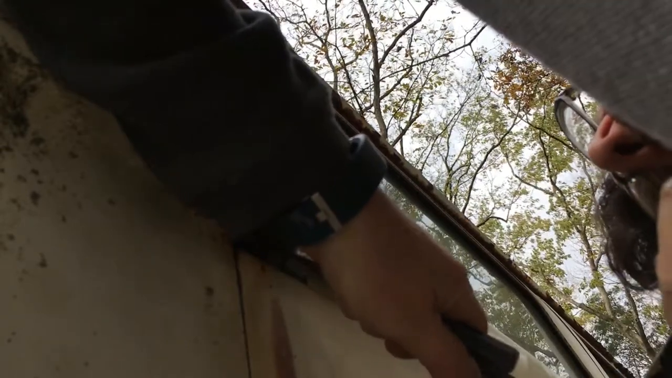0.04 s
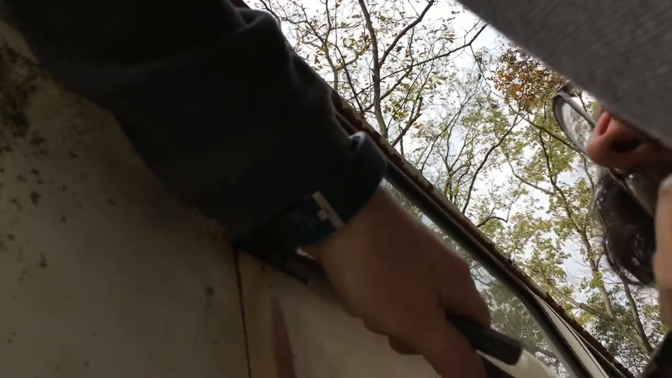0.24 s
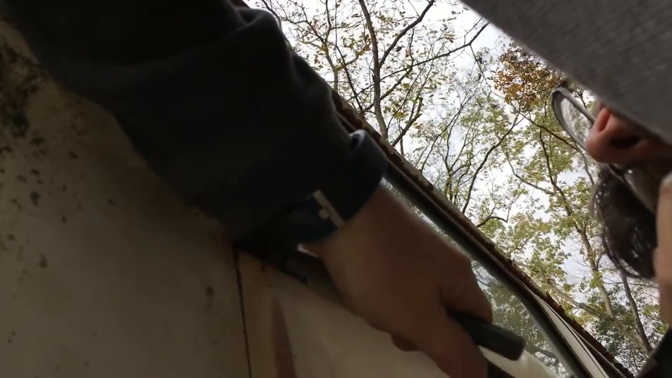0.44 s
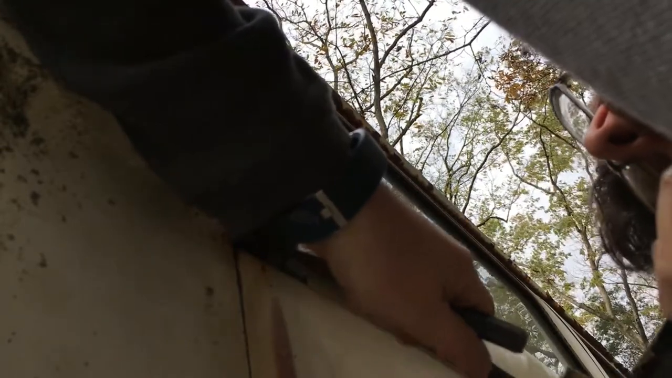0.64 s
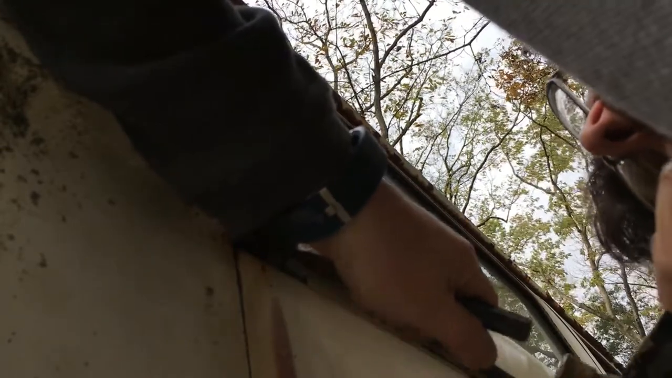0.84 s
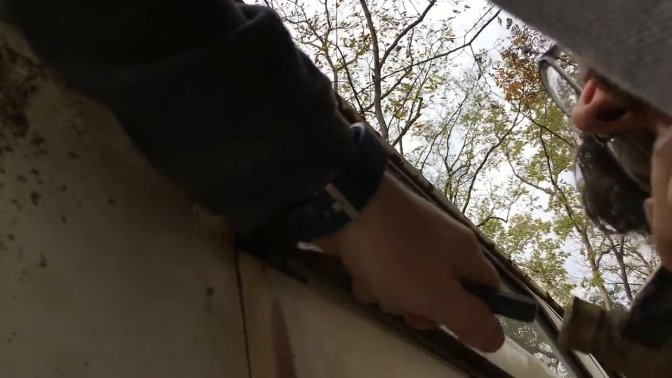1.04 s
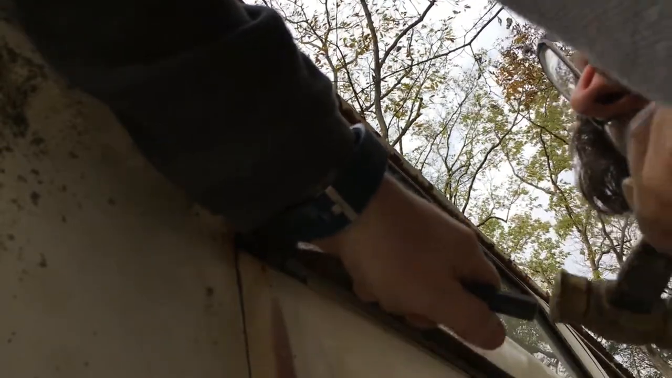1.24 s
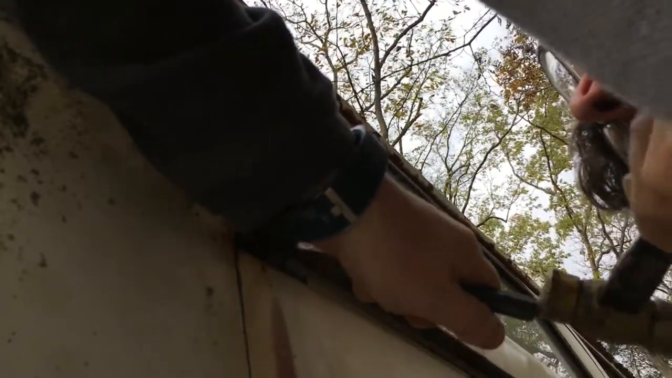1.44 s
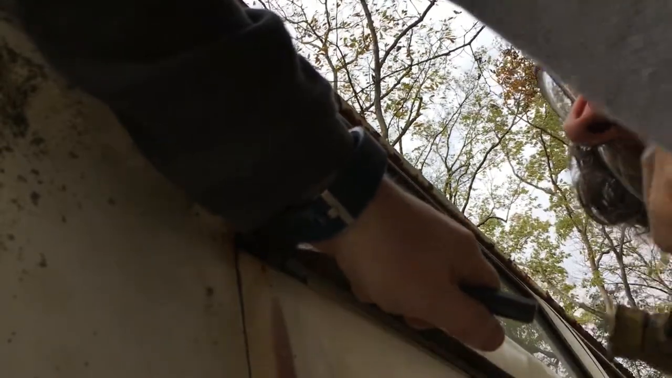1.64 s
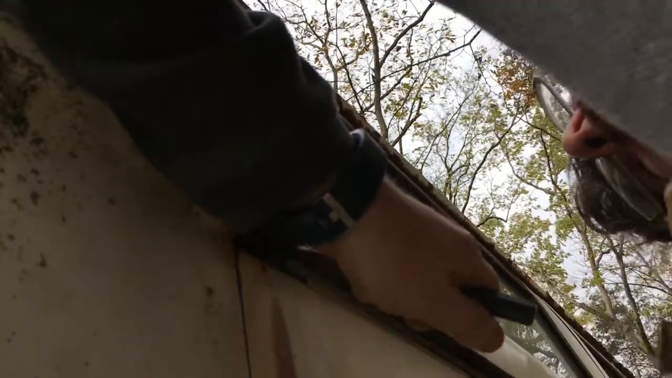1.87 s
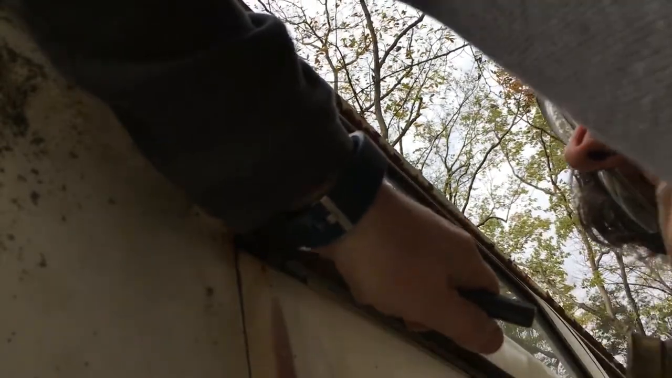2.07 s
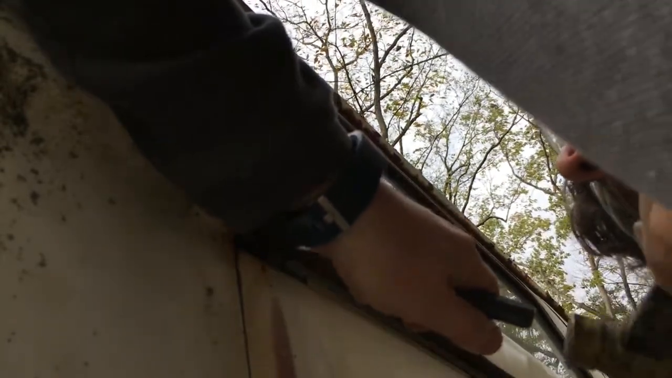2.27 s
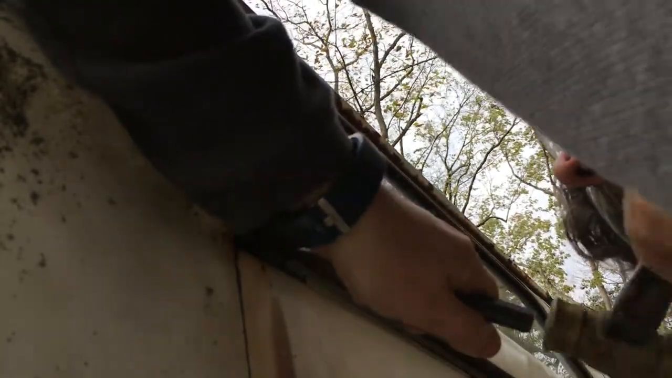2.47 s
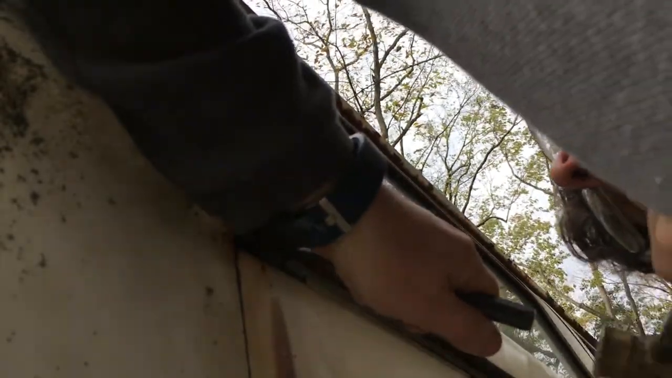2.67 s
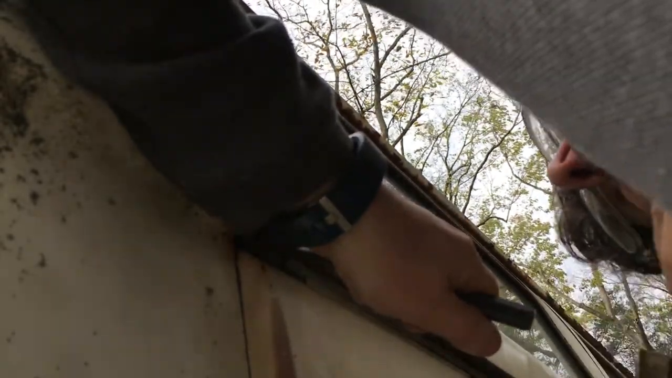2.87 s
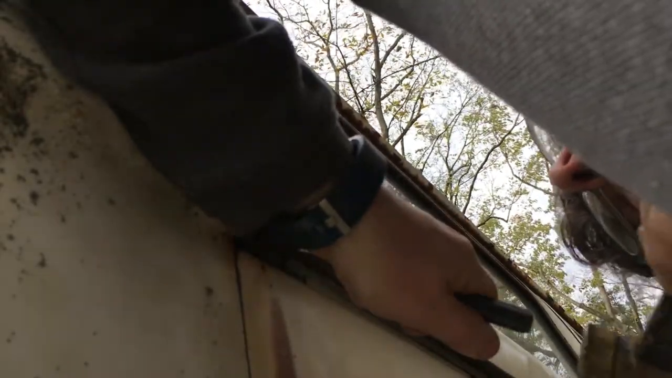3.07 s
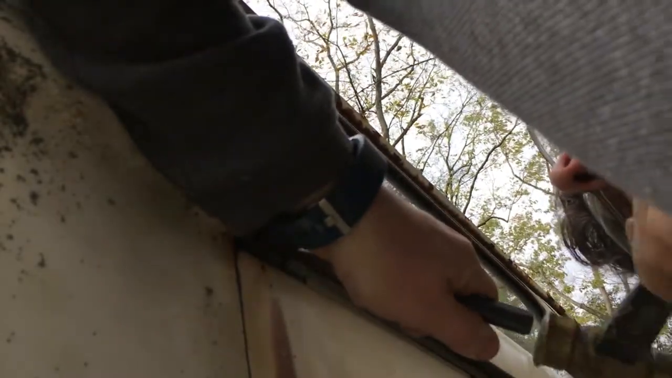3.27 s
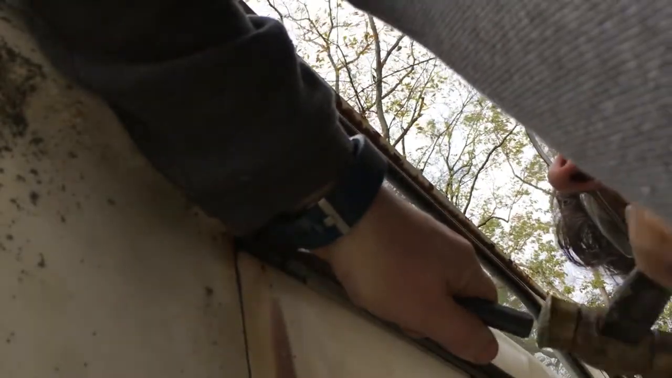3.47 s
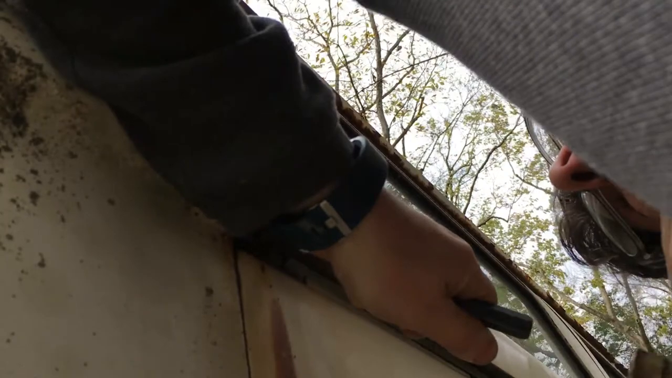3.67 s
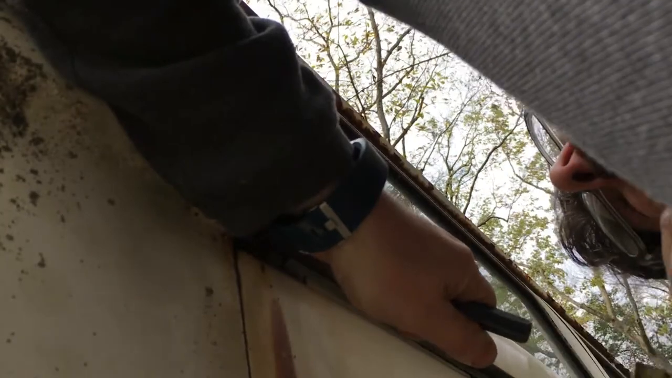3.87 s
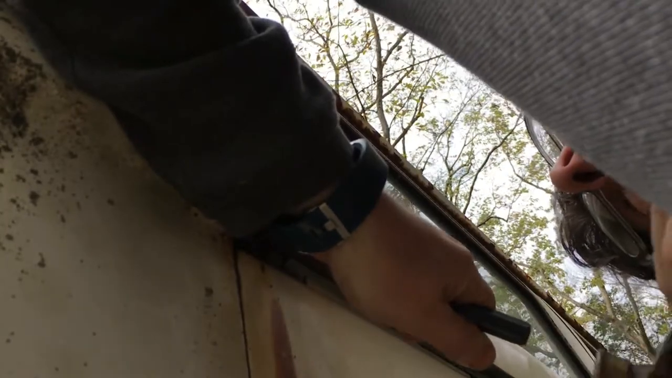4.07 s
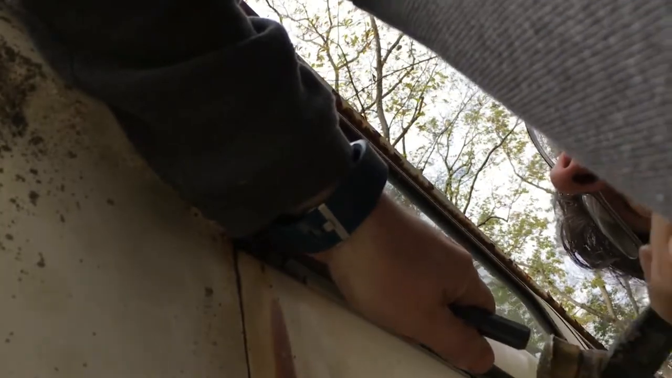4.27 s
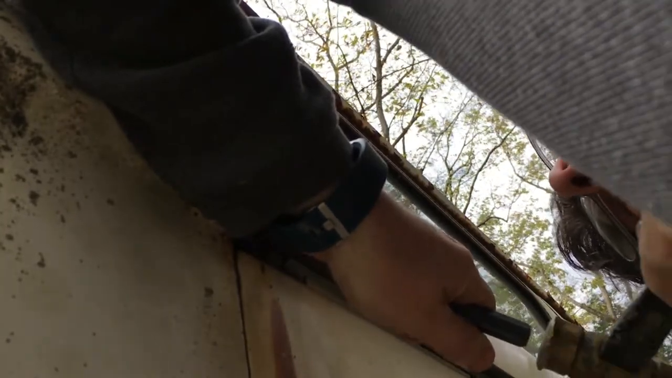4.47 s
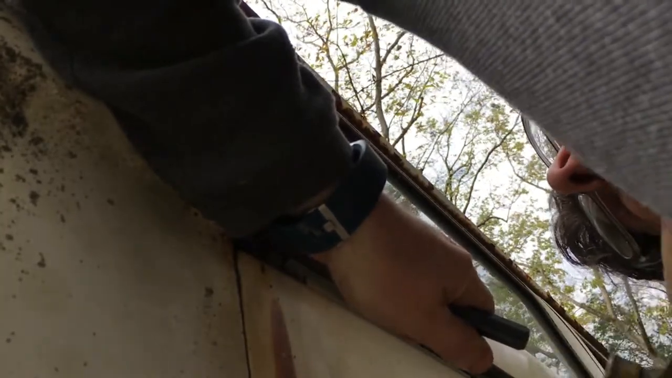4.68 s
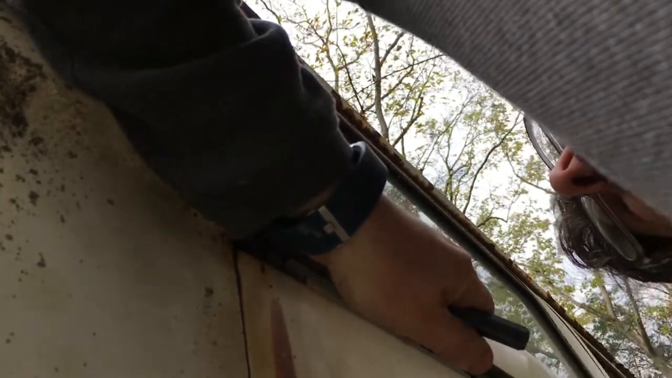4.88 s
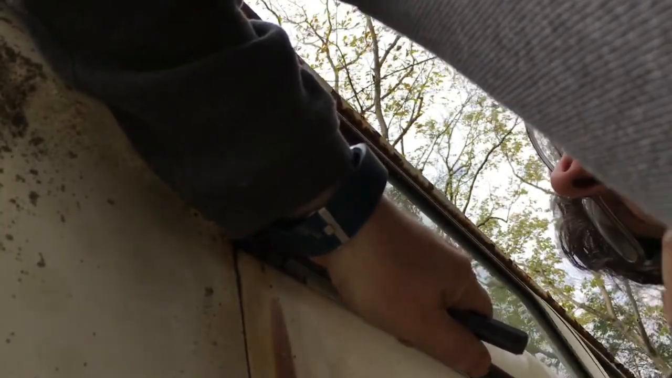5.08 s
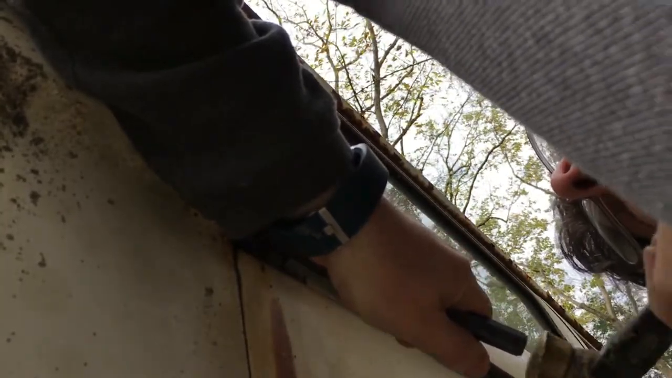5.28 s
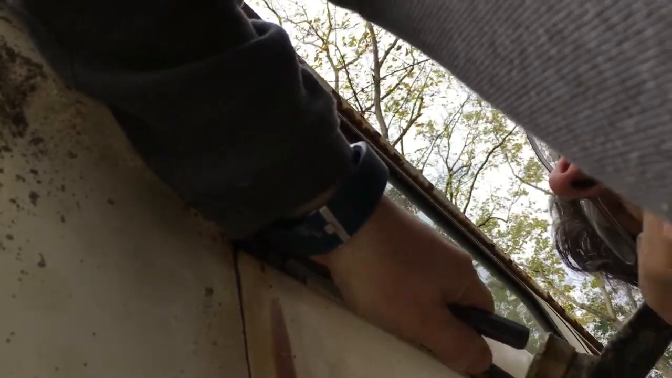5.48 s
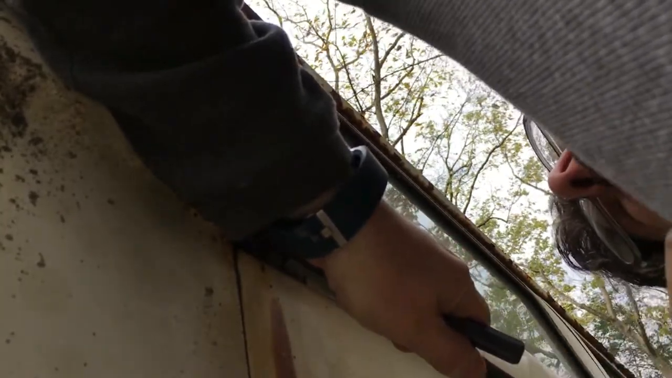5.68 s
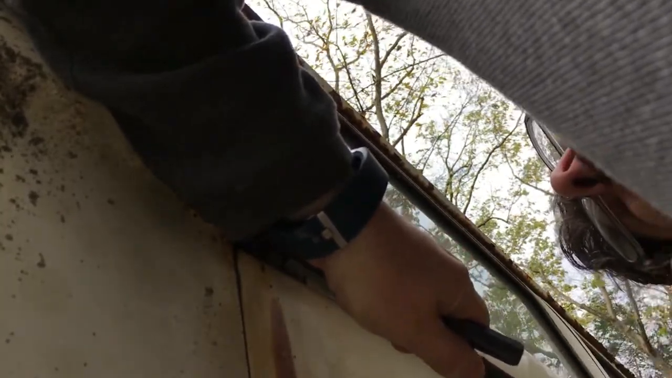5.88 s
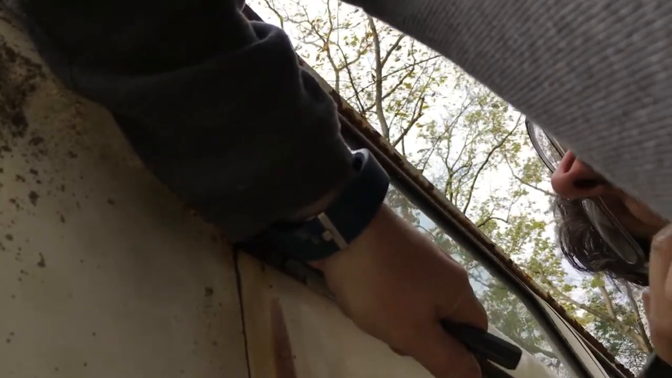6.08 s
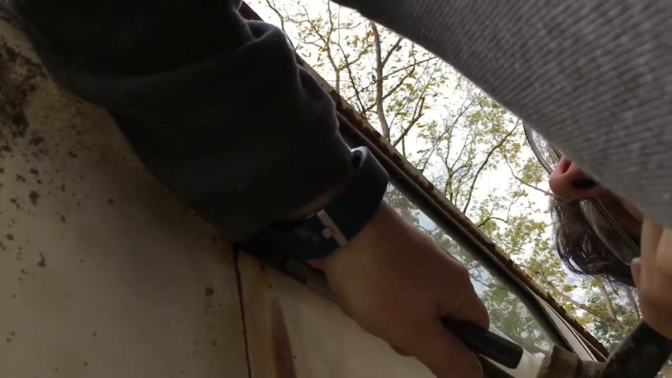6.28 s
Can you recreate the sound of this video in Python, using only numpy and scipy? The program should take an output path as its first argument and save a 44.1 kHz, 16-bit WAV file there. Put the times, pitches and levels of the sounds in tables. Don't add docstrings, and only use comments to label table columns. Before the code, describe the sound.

A hammer drives a cold chisel against a stuck screw in a hollow sheet-metal body. First come wind thumps and soft scuffing knocks, then a duller first blow, then steady loud clanks about a quarter second apart. They grow brighter while the chisel's ring sinks slightly in pitch. Dry open air, near microphone, background almost buried under the blows.

```python
import sys
import numpy as np
from scipy import signal
from scipy.fft import rfft, irfft
from scipy.io import wavfile

SR = 44100
rng = np.random.default_rng(int(sys.argv[2]) if len(sys.argv) > 2 else 0)


def wav_out(sig):
    wavfile.write(sys.argv[1], SR, np.round(np.clip(np.atleast_2d(sig).T, -1, 1) * 32767).astype(np.int16))


def voltage_ratio(decibels):
    exponent = np.asarray(decibels, float) / 20
    return 10 ** exponent


N = 278712


def rms_one(x):
    return x / np.sqrt(np.mean(x ** 2) + 1e-20)


def at_hz(points, hz):
    table_hz, values = np.array(points).T
    return np.interp(np.log(hz), np.log(table_hz), values)


def bandpass(x, low_hz, high_hz):
    return signal.sosfilt(signal.butter(2, [low_hz, high_hz], "band", fs=SR, output="sos"), x)


def coloured(spectrum):
    hz = np.maximum(np.fft.rfftfreq(N, 1 / SR), 1)
    inside = (hz > spectrum[0][0]) & (hz < spectrum[-1][0])
    white = rfft(rng.standard_normal(N))
    return rms_one(irfft(white * voltage_ratio(at_hz(spectrum, hz)) * inside, N))


def drift(rate_hz):
    r = np.exp(-2 * np.pi * rate_hz / SR)
    wander = signal.lfilter([1], [1, -2 * r, r * r], rng.standard_normal(N + SR))
    return rms_one(wander[SR:])


def ring(at_s, sizes, hz, t60):
    clicks = np.full(N, 1e-18)
    clicks[np.round(np.asarray(at_s) * SR).astype(int)] = sizes
    r, w = voltage_ratio(-60 / (t60 * SR)), 2 * np.pi * hz / SR
    return signal.lfilter([0, np.sin(w)], [1, -2 * r * np.cos(w), r * r], clicks)


# (time after the blow [ms], level [dB])
BOUNCE_HITS = [(0.0, 0), (1.5, -3), (5.5, -6), (7.0, -4), (11.0, -9), (15.0, -13), (21.0, -16)]
# (frequency [Hz], level [dB per Hz])
CRACK_COLOUR = [(130, 0), (300, -3.5), (600, -2), (1300, -0.5), (2000, 3), (2900, 1), (4400, 4.5),
                (6300, 1.5), (8500, -11), (12000, -11.5), (14000, -29), (16000, -42)]
# (frequency [Hz], time to fall 60 dB [s])
CLATTER_DECAY = [(130, .45), (350, .35), (800, .15), (2000, .115), (4000, .09), (9000, .085), (16000, .075)]
# (frequency [Hz], share that repeats at each blow [0-1])
BLOW_SAMENESS = [(600, 0.98), (1700, 0.82), (3400, 0.87), (6800, 0.12), (16000, 0.037)]


def crack(s, peak_db, bright_db, body_db, lasting):
    bounce_t60, bounce_dulling_db = 0.0026, 0.36
    tail_db, late_db = -8.5, -37.0
    tail_dulling_db = 1.5
    t, out = np.arange(round(.28 * SR)) / SR, np.zeros(N + SR)
    fresh = rng.standard_normal((len(s), len(t)))
    same = rng.standard_normal(len(t))
    wobble_db = 2 * rng.standard_normal((len(s), len(BOUNCE_HITS)))
    bursts = 0
    for k, (ms, db) in enumerate(BOUNCE_HITS):
        since = t - ms / 1000
        burst = (since >= 0) * voltage_ratio(-60 * np.abs(since) / bounce_t60)
        bursts = bursts + voltage_ratio(db + wobble_db[:, [k]]) * burst
    edges = 130 * 2 ** np.arange(0, 7.1, .35)
    blows = 0
    for low, high in zip(edges, edges[1:]):
        hz = np.sqrt(low * high)
        share = np.clip(at_hz(BLOW_SAMENESS, hz), 0, 1)
        t60 = at_hz(CLATTER_DECAY, hz) * lasting[:, None]
        fall = voltage_ratio(-60 * t / t60 - tail_dulling_db * hz / 1000)
        rise = 1 - np.exp(-t / (.0002 + 1.5 / hz))
        envelope = bursts * voltage_ratio(-bounce_dulling_db * hz * t)
        envelope = envelope + voltage_ratio(tail_db) * fall + voltage_ratio(late_db) * fall ** 0.48
        noise = (np.sqrt(share) * same + np.sqrt(1 - share) * fresh) * envelope * rise
        tilt = np.interp(np.log2(hz / 2000), [-1, 0, 1, 2], [1, 0, 0, 1])
        tilt_db = tilt * (body_db if hz < 2000 else bright_db)
        level_db = peak_db + 9.5 + at_hz(CRACK_COLOUR, hz) + tilt_db + rng.standard_normal(len(s))
        blows = blows + bandpass(noise, low, high) * voltage_ratio(level_db)[:, None]
    for at, blow in zip(np.round(s * SR).astype(int), blows):
        out[at:at + len(t)] += blow
    return out[:N]


def tick(s, level_db):
    t, out = np.arange(round(.02 * SR)) / SR, np.zeros(N)
    envelope = voltage_ratio(-60 * t / 0.0088) * np.minimum(t / 0.00032, 1)
    snap = bandpass(rng.standard_normal((len(s), len(t))) * envelope, 6960, 12600)
    for at, db, click in zip(np.round(s * SR).astype(int), level_db, snap):
        out[at:at + len(t)] += voltage_ratio(db) * click
    return out


# (frequency [Hz], level [dB], time to fall 60 dB [s])
STEEL_MODES = [(364.3, -40, 0.97), (618, -19.5, 0.11), (773, -29.5, 0.18), (808.4, -22.5, 0.2),
               (860, -18, 0.14), (951.7, -24, 0.2), (1089, -25, 0.2), (1164, -33.5, 0.19), (1345, -31, .33),
               (1448, -26, .09), (1600, -26, .06), (1760, -19, .09), (1803, -16, .09), (1868, -18, .085),
               (1980, -20, .08), (2442, -23, .07), (3200, -16, 0.11), (4400, -42, 0.056), (5700, -49, 0.11)]


def steel(s, peak_db, body_db, lasting):
    t, out = np.arange(round(.3 * SR)) / SR, np.zeros(N + SR)
    hz, level_db, t60 = np.repeat(np.transpose(STEEL_MODES), 3, axis=1)[:, :, None]
    held = np.clip((hz - 1000) / 3000, 0, 1)
    build_up = 1 - np.exp(-t / .001)
    grip = rng.standard_normal((len(s), 2, len(hz), 1))
    for k, (strength, detune) in enumerate(grip):
        size = voltage_ratio(peak_db[k] - 1.5 + level_db + (-2 - held) * body_db[k] + 2 * strength)
        shifted_hz = hz * (1 + (.004 + .02 * held) * detune)
        modes = size * np.sin(2 * np.pi * shifted_hz * t) * voltage_ratio(-60 * t / (t60 * lasting[k]))
        out[round(s[k] * SR):][:len(t)] += modes.sum(axis=0) * build_up
    return out[:N]


# (frequency [Hz], width [Hz], level [dB], time to fall 60 dB [s])
CHISEL_RING = [(1826, 200, -15.5, 0.17), (2430, 67, -14.5, 0.095), (3520, 490, -11.5, 0.076),
               (4460, 300, -35, 0.28), (4780, 520, -12, 0.066), (5150, 200, -53, 0.37),
               (6310, 110, -36.5, 0.23), (6364, 120, -15, 0.053), (8200, 510, -33, 0.18)]


def chisel(s, level_db, bite):
    shank_above_hz = 4000
    t, out = np.arange(round(.28 * SR)) / SR, np.zeros(N + SR)
    grip = rng.standard_normal((len(s), len(CHISEL_RING), 2))
    for k, at in enumerate(np.round(s * SR).astype(int)):
        shake = rng.standard_normal(len(t))
        for (hz, width_hz, db, t60), (strength, shift) in zip(CHISEL_RING, grip[k]):
            centre = hz * (1 + .008 * shift) * (bite[k] if hz > shank_above_hz else 1)
            peak = signal.iirpeak(centre, centre / (1.5 * width_hz), fs=SR)
            blur = rms_one(signal.lfilter(*peak, signal.lfilter(*peak, shake)))
            out[at:at + len(t)] += blur * voltage_ratio(level_db[k] + db + 1.5 * strength - 60 * t / t60)
    return out[:N]


# (frequency [Hz], level [dB], time to fall 60 dB [s], side of the still line [+1 or -1])
PANEL_MODES = [(46.8, -23.5, 0.04, -1), (62.0, -32.4, 0.62, -1), (86.6, -18.4, 0.13, 1),
               (98.1, -19.4, 0.33, -1), (124.2, -16.1, 0.2, 1), (139.1, -26.2, 0.3, 1),
               (149.0, -12.2, 0.21, -1), (158.1, -26.5, 0.29, -1), (183.9, -12.5, 0.2, -1),
               (208.0, -9.1, 0.17, 1), (215.9, -23.5, 0.31, 1), (241.3, -7.6, 0.04, -1),
               (244.3, -20.9, 0.33, 1), (251.9, -27.8, 0.9, 1), (258.0, -15.6, 0.22, 1),
               (289.7, -32.0, 0.9, 1), (299.0, -29.6, 0.34, -1), (315.9, -22.8, 0.25, 1),
               (345.5, -23.3, 0.24, 1), (355.2, -27.4, 0.48, 1), (369.8, -33.5, 0.9, -1),
               (380.6, -16.0, 0.18, 1), (392.0, -39.4, 0.9, -1), (440.0, -22.1, 0.18, 1),
               (506.4, -21.2, 0.04, -1), (523.6, -22.6, 0.08, 1), (569.4, -31.0, 0.24, 1),
               (698.6, -39.6, 0.18, -1)]


def panel(s, boom_db):
    out = np.zeros(N)
    for hz, level_db, t60, side in PANEL_MODES:
        travel_s = 0.0019 * np.sqrt(200 / hz)
        reach = np.clip(220 / hz, 1, 2)
        scatter_db = 1.73 * rng.standard_normal(len(s))
        out += ring(s + travel_s, side * voltage_ratio(level_db + reach * boom_db + scatter_db), hz, t60)
    return out


# (time [s], level [dB], pitch [Hz], time to fall 60 dB [s])
SEATING_KNOCKS = [
    (.140, -38, 1190, 0.11),
    (.160, -28, 650, 0.13),
    (0.49, -30, 750, 0.19),
    (.504, -13, 755, 0.04),
    (.513, -24, 636, 0.15),
    (.525, -31, 401, 0.28),
    (.613, -28, 426, 0.12),
]


def knocks():
    t, out = np.arange(round(.2 * SR)) / SR, np.zeros(N)
    treble = signal.butter(2, 3500, fs=SR, output="sos")
    for s, peak_db, hz, t60 in SEATING_KNOCKS:
        puff = rng.standard_normal(len(t)) * np.minimum(t / .003, 1)
        thud = 1.66 * bandpass(puff, .5 * hz, 1.6 * hz) * voltage_ratio(-60 * t / t60)
        faint_tick = signal.sosfilt(treble, puff) * voltage_ratio(-13 - 60 * t / .045)
        mode = 0.32 * np.sin(2 * np.pi * hz * t) * voltage_ratio(-60 * t / (1.04 * t60))
        out[round(s * SR):][:len(t)] += voltage_ratio(peak_db) * (thud + mode + faint_tick)
    return out


# (time [s], level [dB], dying away [dB per s])
WIND_GUSTS = [
    (0.045, -30.5, 220),
    (0.28, -34, 64),
    (0.488, -46, 53),
    (0.658, -46, 44),
    (0.876, -41.5, 399),
    (0.934, -42, 19),
]
# (frequency [Hz], level [dB per Hz])
WIND_COLOUR = [(18, -12), (40, -2), (70, 0), (130, -8), (200, -13), (300, -17), (450, -25)]
# (frequency [Hz], level [dB per Hz])
HISS_COLOUR = [(260, -49), (450, -5.5), (1130, -5.5), (1310, -7), (2330, -6.5), (4650, -9.5), (5830, -11.5),
               (13600, -27), (15800, -27), (16500, -38)]


def air(first_blow_s):
    rise_db_per_s, calm_db, under_blows_db = 330, -45, -48
    t = np.arange(N) / SR
    s, db, dying = np.transpose(WIND_GUSTS)[:, :, None]
    gust_db = np.max(db - np.where(t < s, rise_db_per_s * (s - t), dying * (t - s)), axis=0)
    since = np.maximum(t - first_blow_s, 0)
    wind_db = np.where(since > 0, under_blows_db, np.maximum(gust_db, calm_db))
    steady, lumps_db = coloured(WIND_COLOUR), 3 * drift(14)
    thump = signal.sosfiltfilt(signal.butter(1, 130, fs=SR, output="sos"), steady)
    flutter_db = -46.5 + 0.48 * (wind_db + 46.5)
    wind = (thump * voltage_ratio(wind_db) + (steady - thump) * voltage_ratio(flutter_db)) * voltage_ratio(lumps_db)
    hiss_db = -53.5 - 4.5 * (1 - np.exp(-since / 0.86))
    return wind + coloured(HISS_COLOUR) * voltage_ratio(hiss_db + .6 * drift(6))


def ghost(sharp):
    edge = signal.sosfilt(signal.butter(2, 1200, "high", fs=SR, output="sos"), sharp)
    return voltage_ratio(-39 + 3 * drift(8)) * np.roll(edge, -1024)


# (time [s], level [dB], top-octave brightness [dB], chisel ring [dB], chisel pitch [Hz])
HAMMER_BLOWS = [(1.0945, -0.5, -29, -17, 6800), (1.3188, 0, -9.5, -6.5, 6780), (1.5705, 0.5, -5, -5, 6600),
                (1.8129, 1, -7.5, -6, 6930), (2.0667, 1, -4, -8.5, 6600), (2.3215, 0, -1.5, -6.5, 6870),
                (2.575, 0, -1.5, -5, 6770), (2.831, 0, -0.5, -6, 6320), (3.085, 0, 3.5, -4, 6660),
                (3.344, -0.5, 1.5, -6, 6470), (3.5929, -1, 1, -2.5, 6700), (3.8451, 0, 2.5, -2.5, 6290),
                (4.0806, 0.5, -3, -2.5, 6660), (4.3321, 0, 4.5, -5.5, 6000), (4.579, 0, 5, -5, 5640),
                (4.837, 0, 0, -4, 6200), (5.0923, -0.5, 7, -4, 5980), (5.3433, -0.5, 6, -4.5, 5620),
                (5.5844, 0, 3.5, -7, 5830), (5.6309, -7.5, -33, -11, 5540), (5.8472, 0, 2, -6, 5880),
                (6.104, 1, 0.5, -7.5, 6300)]


def scene():
    s, peak_db, bright_db, ring_db, pitch_hz = np.transpose(HAMMER_BLOWS)
    first_blow_s = s[0]
    s = s + .0004
    boom_db = 0.63 * peak_db + 0.32 * np.minimum(bright_db + 10.5, 0)
    body_db = np.full(len(s), 3.5)
    lasting = voltage_ratio(0.64 * np.minimum(boom_db, 0))
    sharp = crack(s, peak_db, bright_db, body_db, lasting) + steel(s, peak_db, body_db, lasting)
    mono = sharp + ghost(sharp)
    mono = mono + tick(s, -6.5 + peak_db + 0.62 * bright_db)
    mono = mono + chisel(s, peak_db + ring_db, pitch_hz / 6430)
    mono = mono + panel(s, boom_db + 0.077)
    knock_s, knock_db = np.transpose(SEATING_KNOCKS)[:2]
    mono = mono + knocks() + panel(knock_s, knock_db - 14)
    mono = mono + air(first_blow_s)
    return np.array([mono, mono])


def roll_off(x):
    return signal.sosfilt(signal.butter(12, 16770, fs=SR, output="sos"), x)


def record(dry):
    pressed = dry / (1 + (dry / .95) ** 6) ** (1 / 6)
    cut = signal.sosfilt(signal.cheby2(10, 60, 16900, fs=SR, output="sos"), pressed)
    return roll_off(cut)


dry = scene()
out = record(dry)
wav_out(out)
```